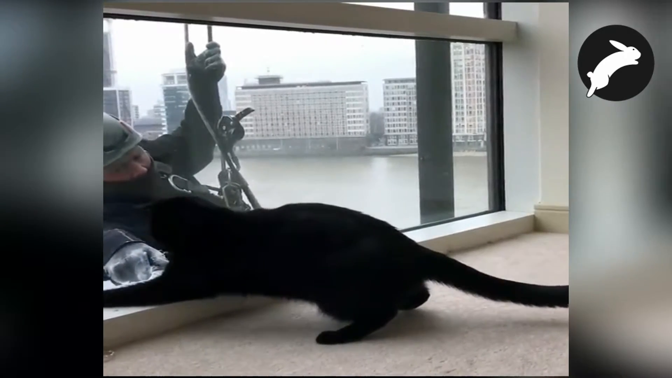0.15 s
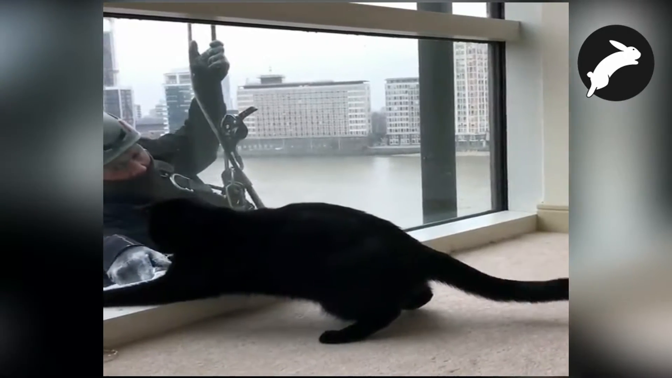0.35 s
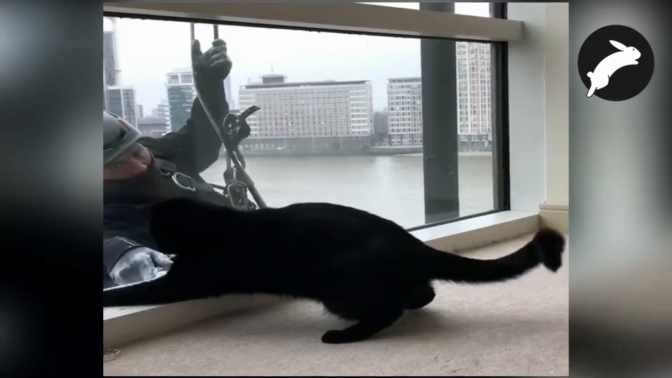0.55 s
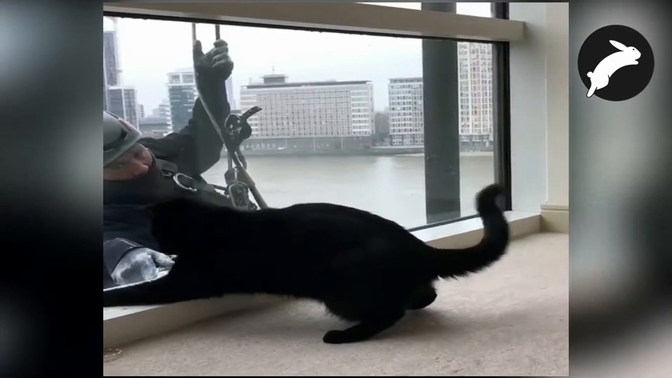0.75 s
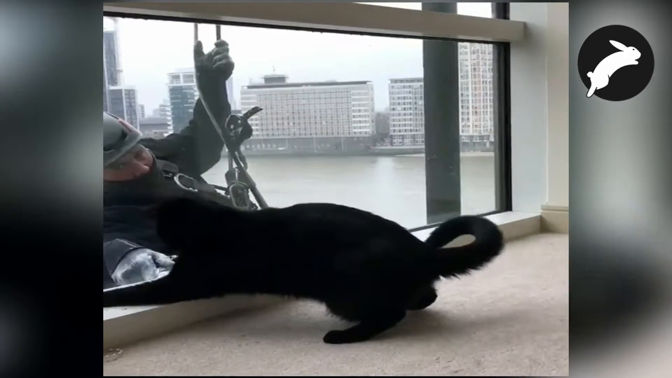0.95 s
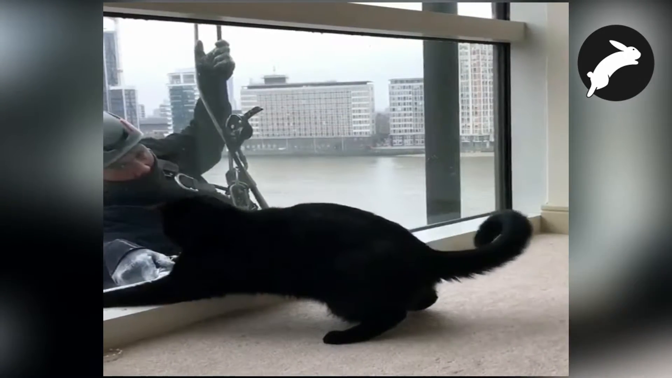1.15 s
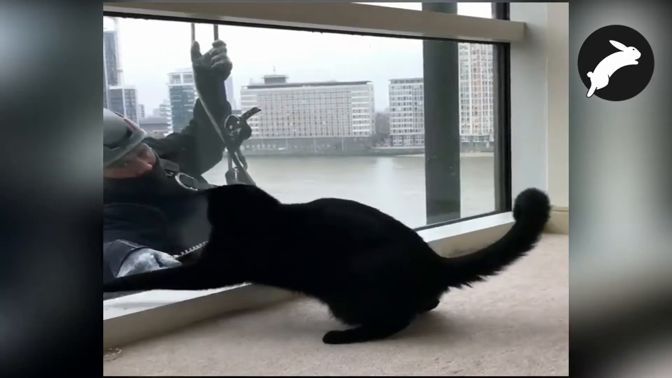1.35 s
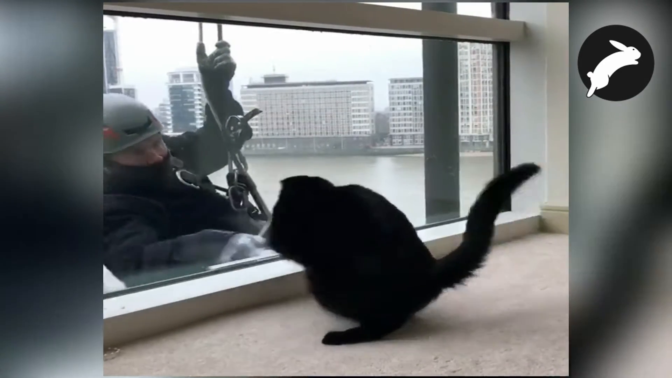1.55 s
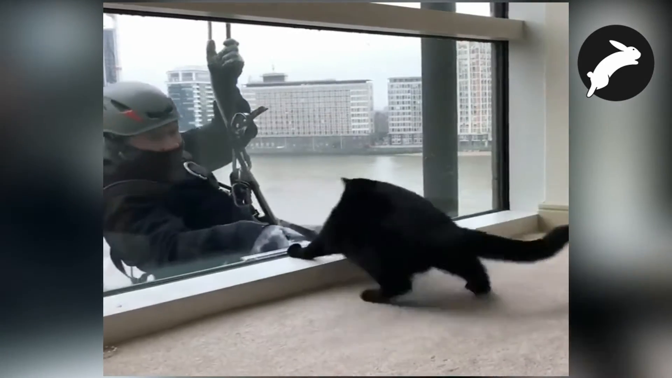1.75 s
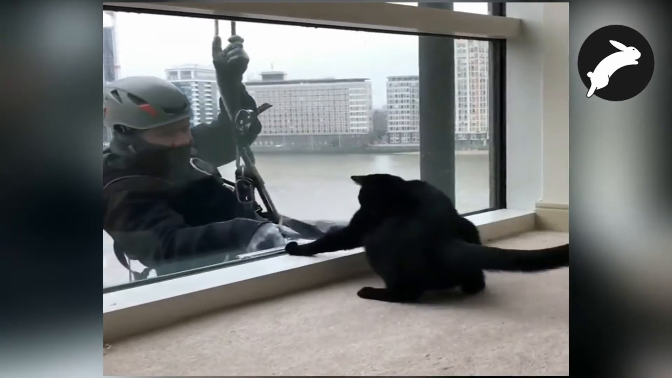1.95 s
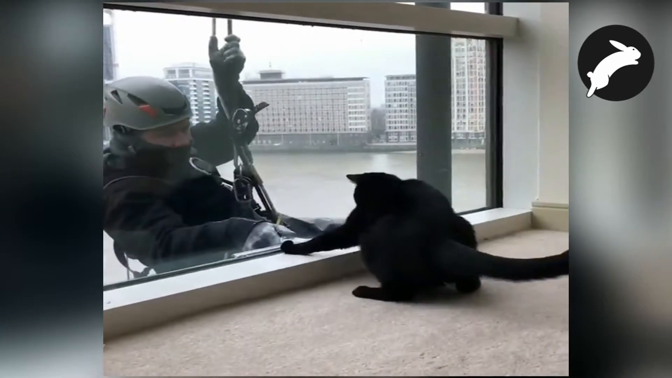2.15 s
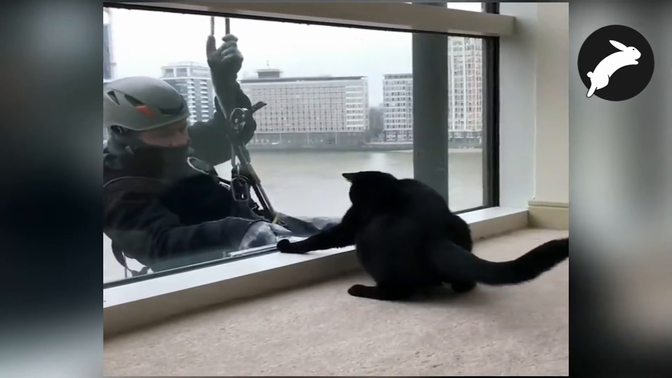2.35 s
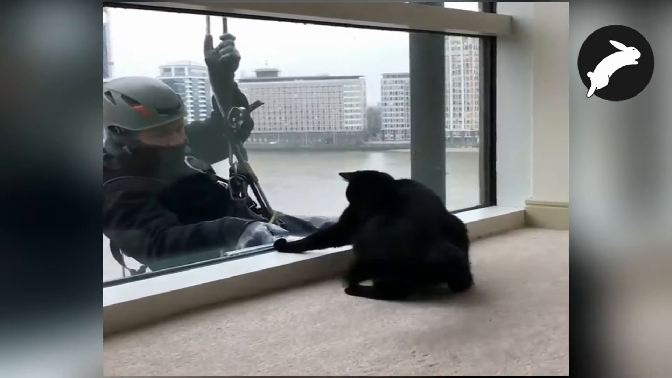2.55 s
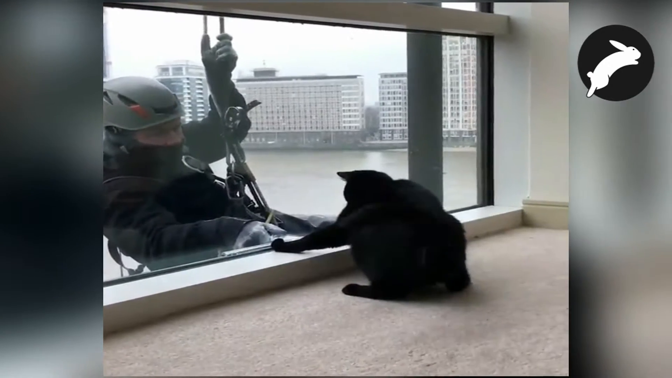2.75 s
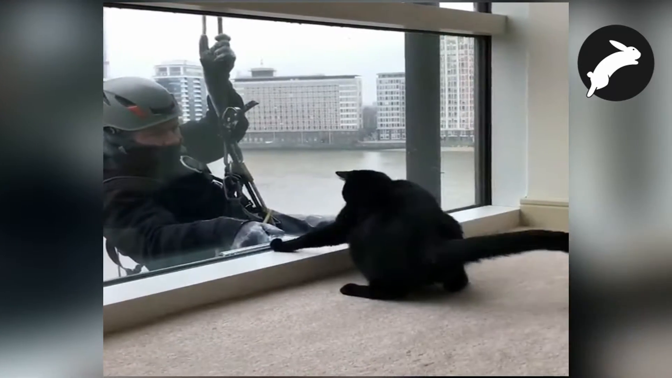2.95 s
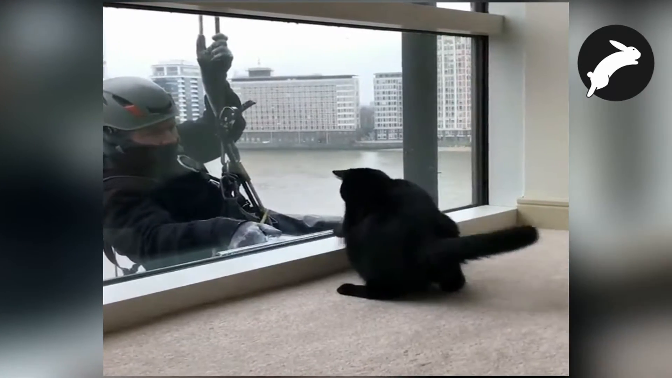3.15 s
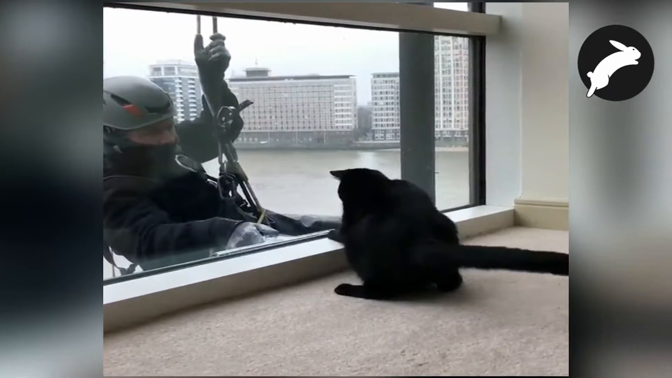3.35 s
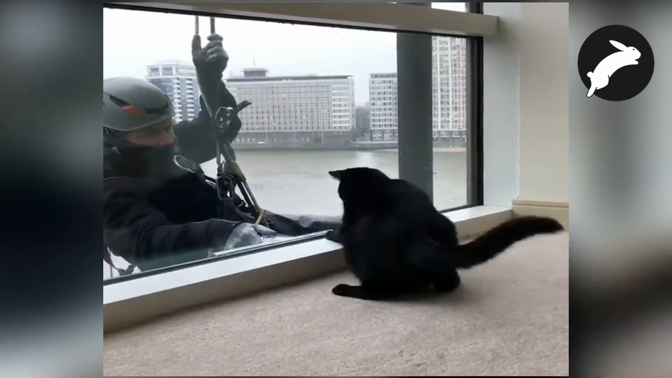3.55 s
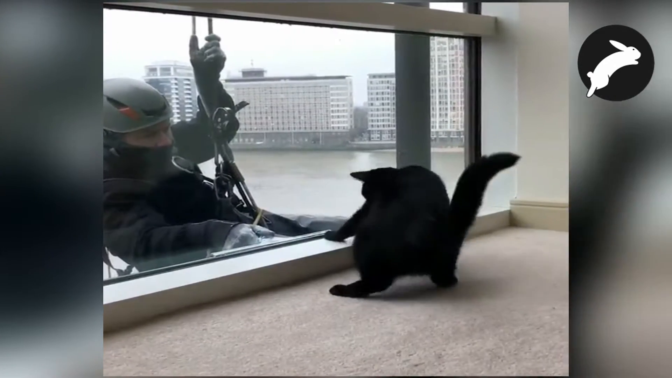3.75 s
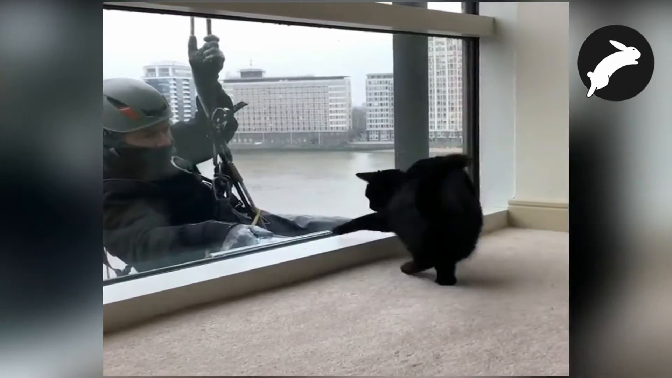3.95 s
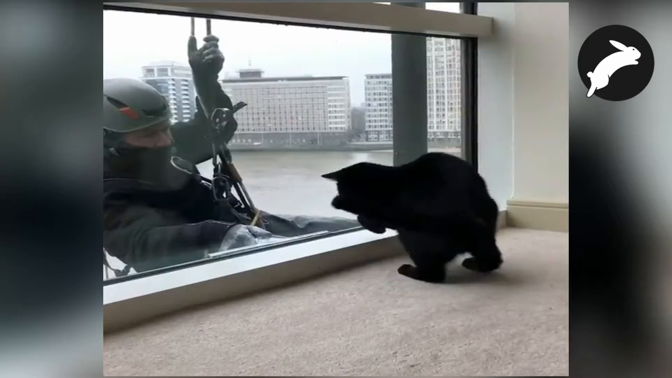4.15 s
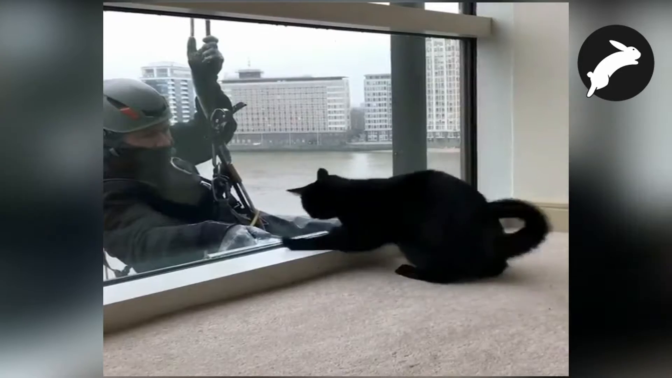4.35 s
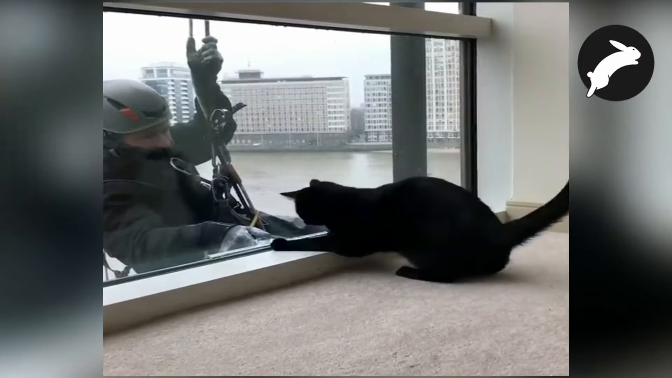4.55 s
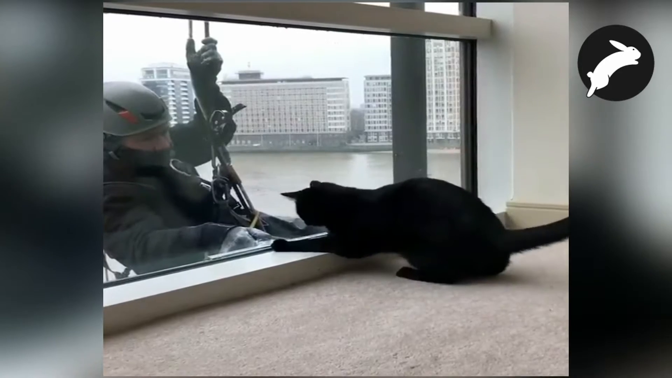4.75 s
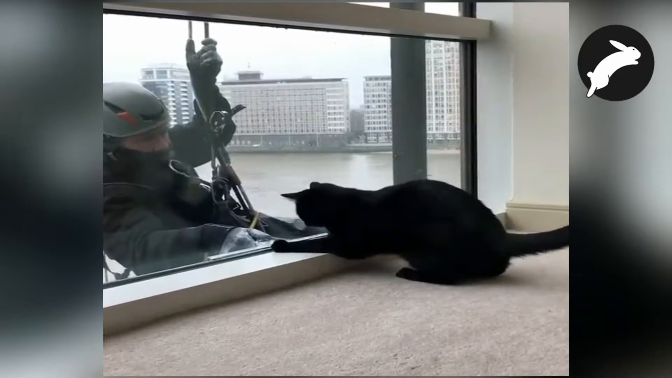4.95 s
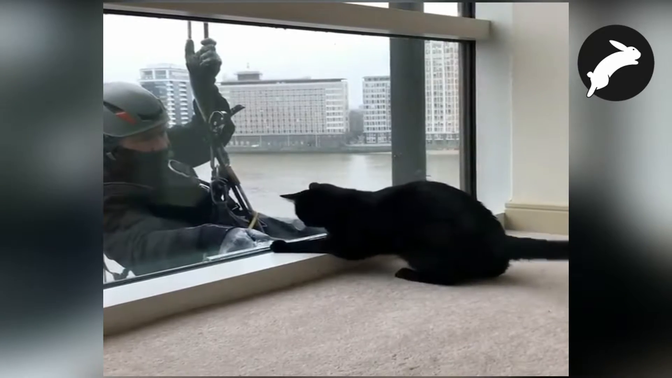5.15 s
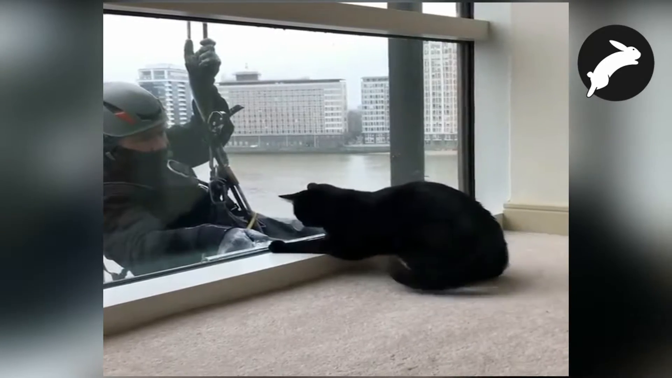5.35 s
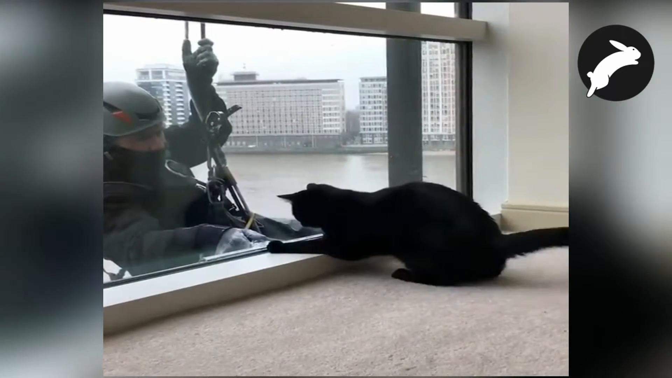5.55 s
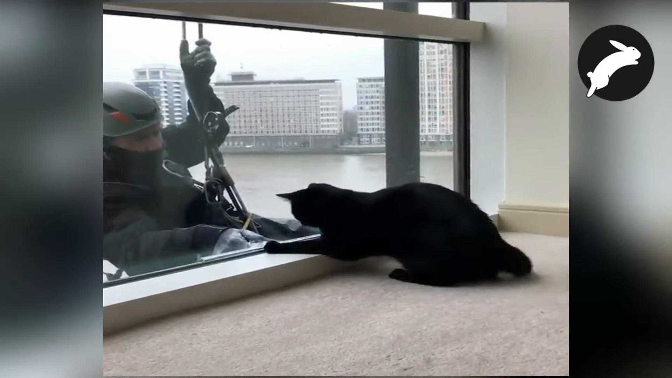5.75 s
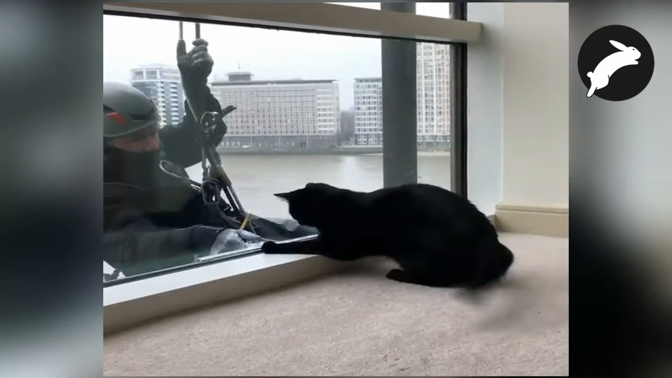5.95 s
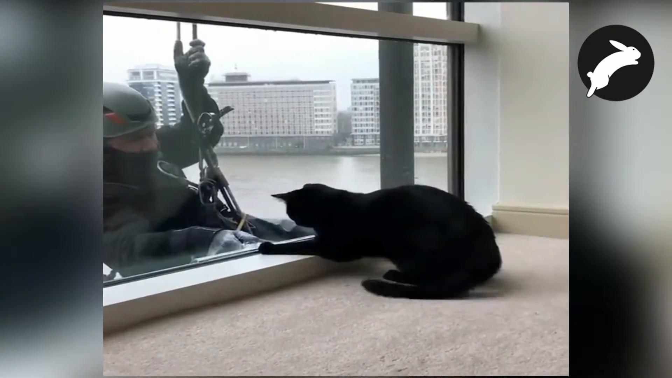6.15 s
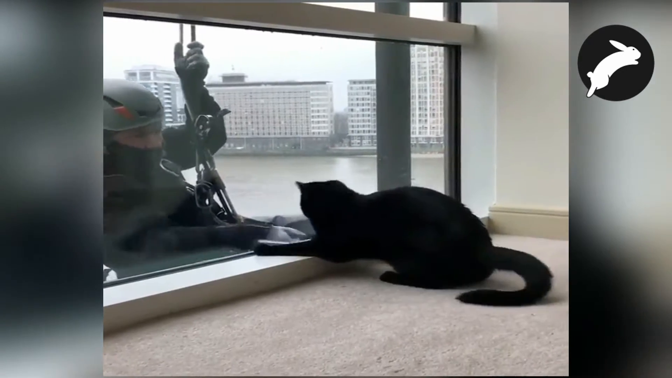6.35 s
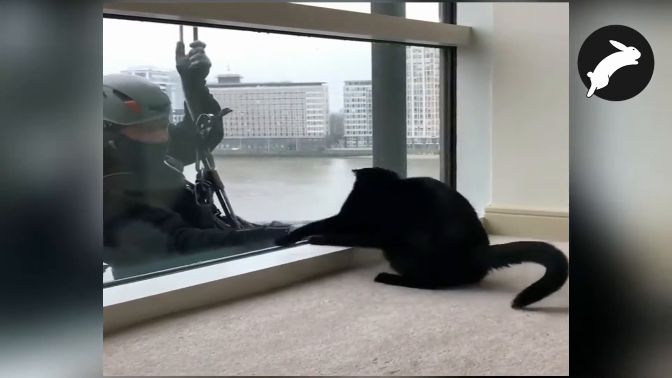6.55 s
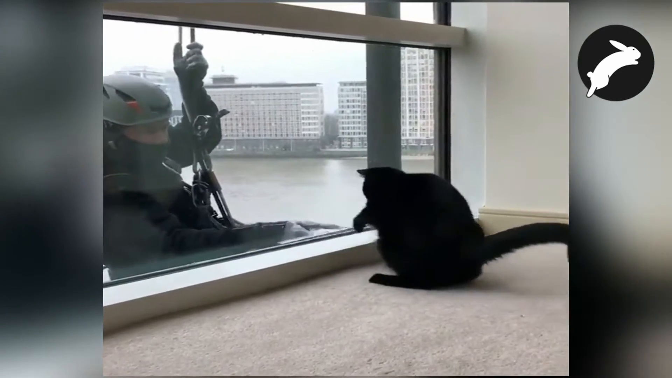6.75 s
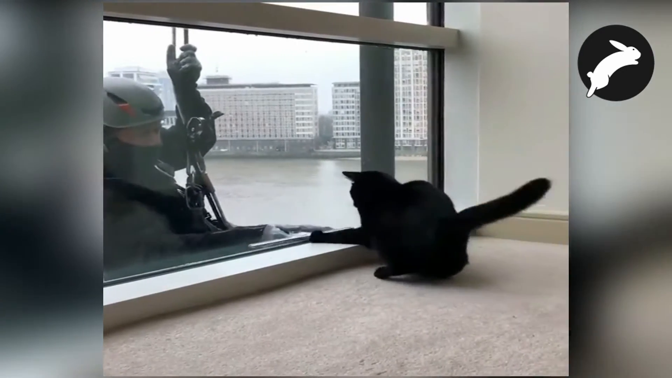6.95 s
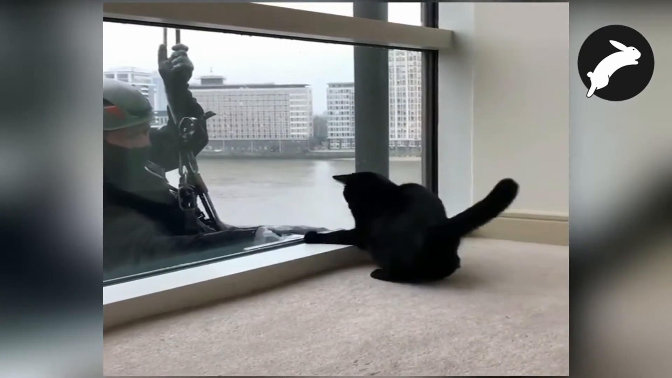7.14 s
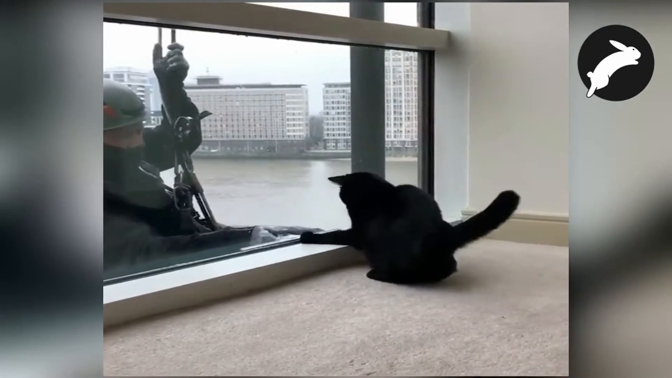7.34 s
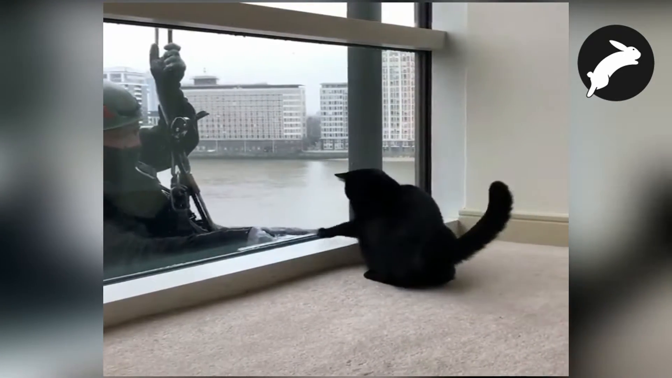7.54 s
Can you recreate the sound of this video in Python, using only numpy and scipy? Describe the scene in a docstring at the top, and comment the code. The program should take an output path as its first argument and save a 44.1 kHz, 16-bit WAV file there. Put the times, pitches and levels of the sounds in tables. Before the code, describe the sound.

Soft padded knocks, short squeaky rubs and tiny claw clicks on window glass, with muffled city drone behind and quiet recorder noise.

```python
"""A cat paws at a tall window pane in a carpeted room: paws knock the glass and slide off it, claws tick.
Knocks are short rough pushes that ring pane and frame; slides are noise that swells, fades and dulls;
ticks are tiny scratches; booms are low sines for the swinging pane. Knocks, slides and ticks get an echo.
The city is shaped noise, rumbling dully through the glass, with two low drones wavering in pitch.
The recorder adds noise hiss and a faint whine of steady sines."""
import sys
import numpy as np
from scipy import signal
from scipy.fft import rfft, irfft, next_fast_len
from scipy.io import wavfile
from scipy.ndimage import map_coordinates

SR = 44100
rng = np.random.default_rng(int(sys.argv[2]) if len(sys.argv) > 2 else 0)


def put_to_file(sound):
    """Save the sound as 16-bit audio at rate SR, in the file named by the first command-line argument."""
    columns = np.atleast_2d(sound).T  # one column per channel
    safe = np.clip(columns, -1, 1)
    whole_steps = np.round(safe * 32767)
    wavfile.write(sys.argv[1], SR, whole_steps.astype(np.int16))


def amplitude_ratio(level_db):
    """Convert a level in decibels to the matching linear amplitude (field) ratio."""
    exponent = np.asarray(level_db, float) / 20
    return 10 ** exponent


N = 334968  # samples in the scene

# Tone colour of the deep city rumble: f/Hz, relative level/dB per Hz
RUMBLE_COLOUR = [(13, -53), (22, -26), (32, -14), (48, -8), (65, -3.5), (110, -9.5), (140, -17.5),
                 (240, -120)]
# Loudness of that rumble over time: t/s, level/dB
RUMBLE_LEVEL = [(0, -53.5), (.7, -46.5), (2.2, -50.5), (4, -48), (4.8, -50.5), (5.8, -48.5), (7.2, -48),
                (7.6, -49)]
# Tone colour of the city murmur: f/Hz, relative level/dB per Hz
MURMUR_COLOUR = [(59, -50), (100, -11), (135, -17.5), (172, -6.5), (200, -14), (230, -11.5), (255, -16.5),
                 (288, -14), (315, -19.5), (375, -19), (420, -24), (800, -29), (1020, -23.5), (1500, -28.5),
                 (2600, -44.5), (3380, -53), (5720, -120)]
# Two low drones, perhaps distant engines, drifting in pitch: t/s, f/Hz, level before flutter/dB
HIGH_ENGINE = [(0, 101.9, -48.5), (.4, 99.2, -61), (.6, 105.4, -51), (.91, 96.7, -46.5), (1.18, 87, -47.5),
               (1.5, 87.8, -60), (1.72, 80.2, -55), (1.95, 69.3, -51.5), (2.28, 78, -50.5),
               (2.49, 82.2, -45), (2.94, 89.5, -43), (3.13, 86.8, -52), (4.04, 87.7, -41),
               (4.25, 82.7, -52), (4.42, 90, -40), (4.62, 90.2, -54), (5.05, 87.6, -45), (5.3, 91.5, -62),
               (5.7, 91.5, -55), (6.05, 88.3, -60), (6.5, 88.2, -47.5), (6.7, 91.2, -57.5),
               (7.1, 89.94, -42), (7.3, 89.6, -53), (7.6, 93.2, -53)]
LOW_ENGINE = [(0, 52.1, -52), (.35, 55.3, -53), (.75, 54.36, -49.5), (1.05, 52.76, -56),
              (1.37, 57.5, -48.5), (1.9, 58, -65), (2.2, 56.67, -48), (2.58, 41.16, -63), (3.04, 41.5, -56),
              (3.45, 46.8, -56), (3.7, 46.97, -60), (3.85, 50.06, -46), (4.19, 50.1, -68),
              (4.51, 63.5, -44), (4.78, 60.4, -45), (5.01, 60.5, -40), (5.23, 59.1, -53),
              (5.35, 57.8, -41.5), (5.52, 53.37, -47.5), (5.65, 52.7, -51), (5.84, 53, -45.5),
              (5.96, 53.5, -50), (7.6, 61.5, -44.5)]
# Tone colour of the recorder's hiss: f/Hz, relative level/dB per Hz
HISS_COLOUR = [(880, -4.5), (1500, -8.5), (2120, -4.5), (3500, -6), (4030, -6), (4760, -8), (6180, -8),
               (10400, -11), (12900, -9), (13900, -12)]
# Recorder whine: multiple of its lowest tone, rms level/dB
WHINE_TONES = [(1, -75), (2, -79), (3, -78.5), (4, -79), (5, -83), (6, -79.5), (7, -82), (8, -86.5),
               (9, -82), (10, -85), (11, -88.5), (13, -85)]
# Paw pads on the pane: t/s, pane peak level/dB, brightest pane f/Hz,
# frame peak level/dB, brightest frame f/Hz
KNOCKS = [(1.395, -46, 1106, -47, 305), (1.438, -30.5, 910, -30.5, 314), (1.647, -29.5, 640, -40, 294),
          (1.661, -28, 1760, -42, 305), (1.668, -28.5, 1000, -30, 223), (1.680, -32.5, 1340, -32.5, 445),
          (1.6875, -20.5, 1070, -36.5, 315), (1.698, -20, 1126, -34.5, 200), (1.709, -28.5, 950, -34, 200),
          (1.745, -38, 1400, -58, 323), (1.802, -44.5, 1490, -54, 300), (4.363, -43.5, 810, -35.5, 142),
          (4.397, -30, 1090, -29.5, 200), (4.403, -20.5, 1030, -35, 313), (4.411, -22, 1290, -28.5, 200),
          (4.424, -29.5, 920, -29.5, 200), (4.441, -34, 1270, -37, 200), (4.632, -49, 1307, -41.5, 393),
          (6.24, -44.5, 1026, -65, 301), (6.426, -27, 842, -32, 397.4), (6.433, -29.5, 889, -32, 140),
          (6.925, -35, 1000, -38.5, 315), (6.937, -28.5, 730, -34, 325), (6.9401, -24, 1340, -33.5, 200),
          (6.965, -37, 1450, -44.5, 200), (7.0, -44, 1690, -54, 320), (7.049, -38, 901, -35, 303),
          (7.057, -33, 1026, -48, 320)]
# Ringing tones of the glass: f/Hz, width/Hz, relative level/dB
PANE_TONES = [(640, 90, -6), (834, 140, -7), (839, 55, 2), (1000, 70, 3), (1136, 41, 5), (1193, 36, 1.5),
              (1293, 77, 3), (1418, 20, -5), (1476, 22, 2), (1646, 19, -2), (1900, 22, -2), (2300, 23, -32),
              (2456, 14, -7.5), (3023, 39, -13.5), (3530, 46, -27)]
# Ringing tones of the window frame: f/Hz, width/Hz, relative level/dB
FRAME_TONES = [(133, 12, 6), (200, 13, -5), (254, 27, -17.5), (301, 21, -1), (410, 8.3, 5),
               (447, 74, -18.5)]
# How long the room's echo takes to fall by 60 dB: f/Hz, fall time/s
ROOM_FADE = [(150, 0.55), (1000, 0.32), (4000, 0.4), (12000, 0.24)]
# Fur and pads sliding over the glass: t of full stroke/s, rise time/s, swish level/dB,
# level of the rub through the pane/dB, brightness/0-1
STROKES = [(1.445, 0.013, -53.5, -44, .15), (1.538, 0.098, -58, -56, 0.6), (1.653, .006, -43, -42, 0.3),
           (1.7, 0.036, -46.5, -39, 0.67), (1.84, .05, -60, -70, 0.7), (4.343, .003, -49, -52, 0),
           (4.41, 0.019, -46, -39, 0.36), (4.463, 0.053, -36.5, -46, 0.87), (4.55, .05, -57, -58, 0.3),
           (4.645, 0.034, -57, -71, 0.22), (6.445, 0.013, -67, -41.5, 0.02), (6.886, 0.0046, -51, -49, 0),
           (6.94, 0.013, -49.5, -52, .8), (6.964, 0.039, -54.5, -49.5, 0.52), (7.065, 0.059, -70, -54, 0.3)]
# Tone colour of the swish, before it is tilted dull or bright: f/Hz, relative level/dB per Hz
SWISH_COLOUR = [(880, -42), (1500, -3.5), (2200, -10.5), (2460, -11), (2750, -10), (4060, -7), (5280, -12),
                (13900, -17)]
# Claw tips on glass: t/s, peak level/dB, centre f/Hz, width of each of two filter passes/Hz,
# scratch decay time/s
TICKS = [(1.435, -49, 3530, 3040, 0.0027), (1.6465, -20, 3850, 4020, 0.00094),
         (1.6488, -17.5, 2500, 3100, 0.0026), (2.913, -53.5, 5340, 900, 0.0099),
         (3.249, -43.5, 5160, 4003, 0.0014), (4.3405, -28, 4100, 2575, 0.0019),
         (4.4303, -24, 5000, 9230, .0006), (4.636, -52, 4300, 1483, 0.0048),
         (6.4268, -45.5, 2450, 600, .004), (6.882, -34.5, 2596, 2995, 0.003),
         (6.886, -34, 3500, 3963, 0.001), (7.049, -45, 2997, 2500, .002), (7.537, -48.5, 5440, 594.5, .015)]
# The whole pane swings as weight lands on it: t/s, peak level/dB, f/Hz
BOOMS = [(1.683, -28.5, 93.6), (4.429, -33.5, 102), (4.474, -26, 81.8), (6.24, -40, 75), (6.432, -38, 99.6),
         (6.454, -34, 67)]

MURMUR_DB = -53  # before its level wavers
WHINE_HZ = 996  # lowest tone
TOP_HZ = 14050  # the recorder turns down what lies above
# A harder blow touches more briefly: contact time at one level, and halvings for each dB above it
CONTACT_S, CONTACT_AT_DB, HALVES_PER_DB = 0.0036, -28, 0.2
BOOM_RISE_S, BOOM_T60_S = 0.011, 0.17  # T60: time to fall by 60 dB
RISE_DB = 16.5  # how far a stroke climbs to its full level
SWISH_FALL_DB_PER_S, RUB_FALL_DB_PER_S = 299, 240
DULLS_PER_S = 4.5  # brightness lost each second


def unit(x):
    """Scale x to rms 1."""
    return x / np.sqrt(np.mean(x ** 2) + 1e-20)


def along(points, hz):
    """Read (f/Hz, value) points at any frequency, on a log axis."""
    f, value = np.transpose(points)
    return np.interp(np.log(hz + 1), np.log(f + 1), value)


def curves(rows):
    """Join timed rows into one smooth-running value per sample, for each column after the time."""
    s, *columns = np.transpose(rows)
    return [np.interp(np.arange(N) / SR, s, column) for column in columns]


def wobble(rate):
    """A smooth random curve with `rate` random points a second."""
    points = rng.standard_normal(int(N * rate / SR) + 4)
    return map_coordinates(points, [np.arange(N) * rate / SR])


def filtered(x, response):
    """Pass x through a filter given as a (complex) response to frequency."""
    size = next_fast_len(len(x) + 8192)  # spare room for ringing
    spectrum = rfft(x, size) * response(np.fft.rfftfreq(size, 1 / SR))
    return irfft(spectrum, size)[:len(x)]


def noise(colour):
    """Random noise of rms 1 with the given tone colour."""
    return unit(filtered(rng.standard_normal(N), lambda f: amplitude_ratio(along(colour, f))))


def resonant(modes):
    """Response of an object that rings at each (f/Hz, width/Hz, level/dB), with alternating signs."""
    def response(f):
        total = 0
        for k, (centre, width, db) in enumerate(modes):
            damping = 1j * f * width
            total = total + (-1) ** k * amplitude_ratio(db) * damping / (centre ** 2 - f ** 2 + damping)
        return total
    return response


def add(track, s, sound, db):
    """Place a sound in the track at time s, with its peak at db."""
    part = track[round(s * SR):][:len(sound)]
    part += amplitude_ratio(db) * sound[:len(part)] / np.abs(sound).max()


def city():
    """Deep rumble and wavering murmur through the glass: noise with little treble."""
    rumble_db, = curves(RUMBLE_LEVEL)
    rumble = amplitude_ratio(rumble_db) * noise(RUMBLE_COLOUR)
    murmur = amplitude_ratio(MURMUR_DB) * noise(MURMUR_COLOUR) * amplitude_ratio(1.6 * wobble(4.9))
    return rumble + murmur


def engine(rows, width_hz):
    """A drone: slow noise roughens a drifting tone into a narrow band, and its level flutters."""
    hz, db = curves(rows)
    slow = [unit(filtered(rng.standard_normal(N), lambda f: 1 / (1 + (f / width_hz) ** 4)))
            for _ in range(2)]
    phase = 2 * np.pi * np.cumsum(hz) / SR
    drone = unit((2.5 + slow[0]) * np.cos(phase) + slow[1] * np.sin(phase))
    return amplitude_ratio(db + 2.03 * wobble(8)) * drone


def hiss():
    """The recorder's electronics hiss: steady coloured noise."""
    return amplitude_ratio(-61.5) * noise(HISS_COLOUR)


def whine():
    """The electronics whine: steady sines at whole multiples of one pitch."""
    t = np.arange(N) / SR
    return sum(amplitude_ratio(db) * np.sqrt(2) * np.sin(2 * np.pi * (k * WHINE_HZ * t + rng.random()))
               for k, db in WHINE_TONES)


def struck(modes, hz):
    """A soft pad gives a dull thud at once and rings most the tones near hz, set by where it lands."""
    def near(f, share):
        return resonant([(hz, share * hz, 0)])(f) ** 2

    def response(f):
        soft = 1 / (1 + 1j * f / (1.6 * hz)) ** 2  # a pad is too soft to drive the treble
        thud = 0.75 * near(f, 0.65)
        ring = resonant(modes)(f) * (0.15 + near(f, 0.26))
        return soft * (thud + ring)
    return response


def knocks():
    """Paws knock the window: each short rough contact drives both the pane and the frame."""
    track, t = np.zeros(N), np.arange(SR // 4) / SR
    for s, pane_db, pane_hz, frame_db, frame_hz in KNOCKS:
        length = CONTACT_S * 2 ** (HALVES_PER_DB * (CONTACT_AT_DB - max(pane_db, frame_db)))
        swell = 1 - np.exp(-4 * t / length)
        push = np.exp(-t / length) * swell * rng.standard_normal(len(t))
        push[0] = 6e-5 / length ** 2  # a short contact is all first touch, a long one a soft brush
        add(track, s, filtered(push, struck(PANE_TONES, pane_hz)), pane_db)
        add(track, s, filtered(push, struck(FRAME_TONES, frame_hz)), frame_db)
    return track


def room(x):
    """The room's echo: a noise tail in which each frequency dies at its own speed."""
    hz, t, z = signal.stft(rng.standard_normal(SR // 2), SR, nperseg=256)
    fade = amplitude_ratio(-60 * t / along(ROOM_FADE, hz)[:, None])
    tail = signal.istft(z * fade, SR, nperseg=256)[1]
    late = np.pad(x, (130, 0))  # the echo starts 130 samples, about 3 ms, later
    return signal.fftconvolve(late, tail / np.linalg.norm(tail))[:N]


def slides():
    """Fur swishes and a pad rubs the pane in uneven catches; each stroke swells, fades and dulls."""
    # each pair holds a dull and a bright version
    swishes = [unit(filtered(noise(SWISH_COLOUR) * amplitude_ratio(0.65 * wobble(70)), lambda f: (f + 300) ** tilt))
               for tilt in (-.6, .4)]
    catches = rng.standard_normal((2, N)) * amplitude_ratio(2.7 * wobble(90))
    rubs = [unit(filtered(c, lambda f: resonant(PANE_TONES)(f) * (f + 100) ** tilt))
            for c, tilt in zip(catches, (-.3, 1.4))]
    track, t = np.zeros(N), np.arange(N) / SR
    for s, rise, swish_db, rub_db, bright in STROKES:
        after = np.maximum(t - s, 0)
        rising = np.where(t > s - rise, amplitude_ratio(RISE_DB * np.minimum(t - s, 0) / rise), 0)
        turn = np.clip(bright - DULLS_PER_S * after, 0, 1) * np.pi / 2  # 0 is all dull
        swish_fade = swish_db - SWISH_FALL_DB_PER_S * after
        rub_fade = rub_db - RUB_FALL_DB_PER_S * after
        for (dull, sharp), db in ((swishes, swish_fade), (rubs, rub_fade)):
            track += rising * amplitude_ratio(db) * (np.cos(turn) * dull + np.sin(turn) * sharp)
    return track


def ticks():
    """A claw tip gives a dry, wide click; in the glass its treble runs ahead of its bass."""
    track, t = np.zeros(N), np.arange(SR // 20) / SR
    for s, db, hz, width, length in TICKS:
        scratch = np.exp(-t / length) * .5 * rng.standard_normal(len(t))
        scratch[0] = 0.0048 / length  # a quick touch is one sharp click

        def glass(f):
            bending = np.exp(-1j * .25 * np.sqrt(f))  # delay falls as one over the root of frequency
            return resonant([(hz, width, 0)])(f) ** 2 * bending
        add(track, s, filtered(scratch, glass), db)
    return track


def booms():
    """The lowest bending of the pane, a sine, swells under the push and dies away."""
    track, t = np.zeros(N), np.arange(SR // 2) / SR
    for s, db, hz in BOOMS:
        swell = (1 - np.exp(-t / BOOM_RISE_S)) ** 2
        add(track, s, np.sin(2 * np.pi * hz * t) * swell * amplitude_ratio(-60 * t / BOOM_T60_S), db)
    return track


def scene():
    """The city outside, the cat at the glass and its echo in the room."""
    outside = city() + engine(HIGH_ENGINE, width_hz=5.3) + engine(LOW_ENGINE, width_hz=6.4)
    cat = knocks() + slides() + ticks()
    return (outside + cat + amplitude_ratio(-7.5) * room(cat) + booms())[None]


def top_cut(x):
    """Nothing passes above the cut-off."""
    return signal.sosfilt(signal.butter(12, 14730, fs=SR, output="sos"), x)


def record(dry):
    """The electronics add hiss and whine, and turn everything from TOP_HZ up down by 43 dB."""
    noisy = dry[0] + hiss() + whine()
    mix = filtered(noisy, lambda f: np.where(f < TOP_HZ, 1, amplitude_ratio(-43)))
    return top_cut(mix[None])


dry = scene()
out = record(dry)
put_to_file(out)
```